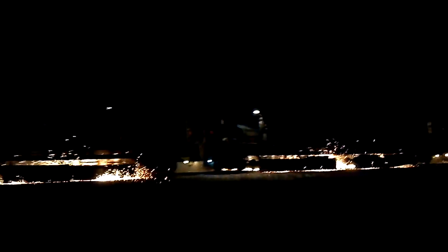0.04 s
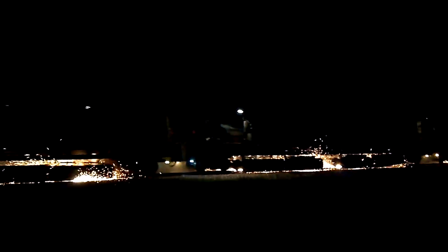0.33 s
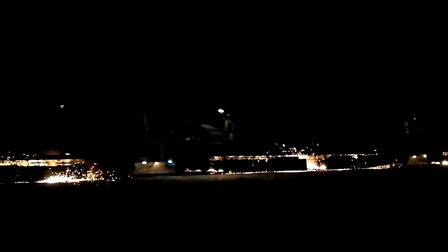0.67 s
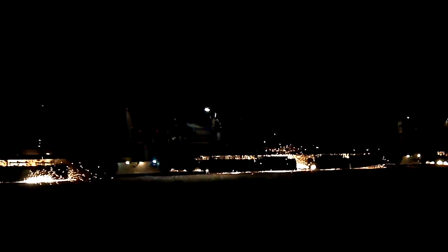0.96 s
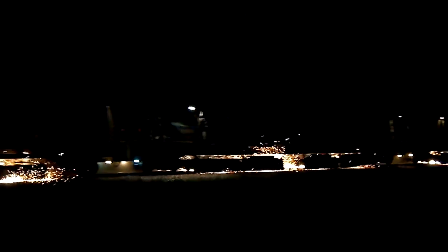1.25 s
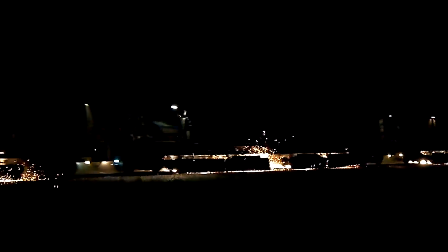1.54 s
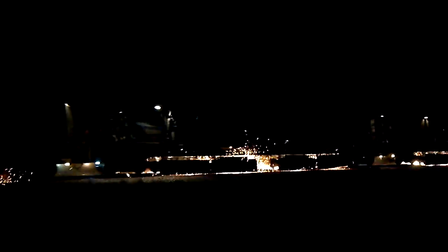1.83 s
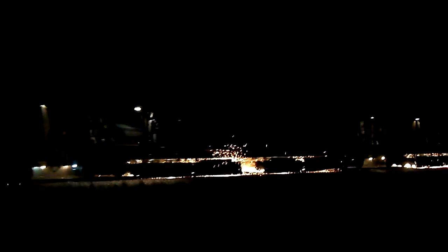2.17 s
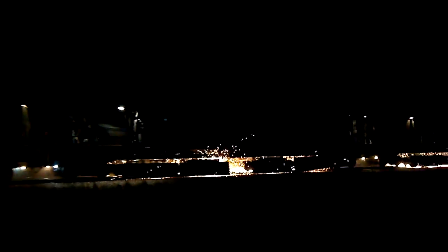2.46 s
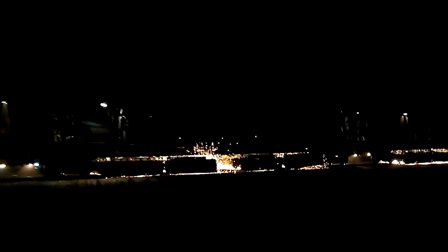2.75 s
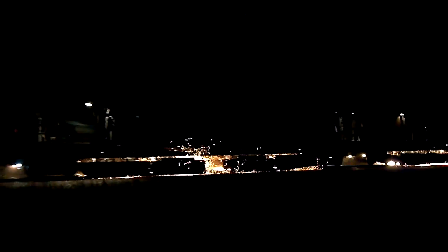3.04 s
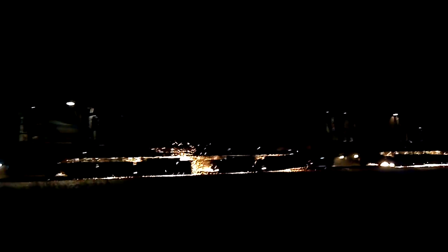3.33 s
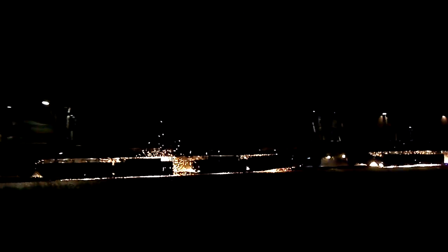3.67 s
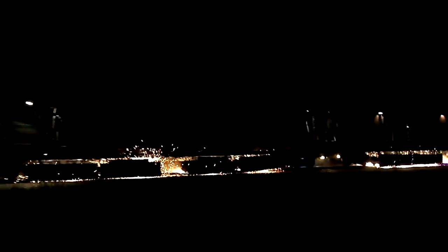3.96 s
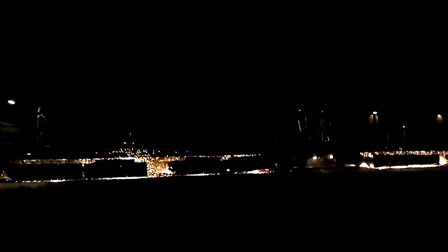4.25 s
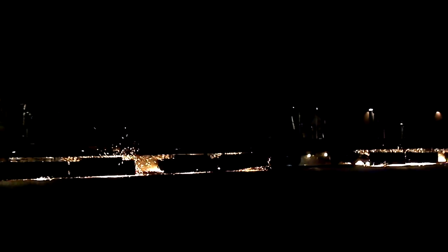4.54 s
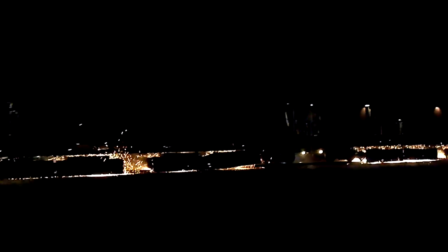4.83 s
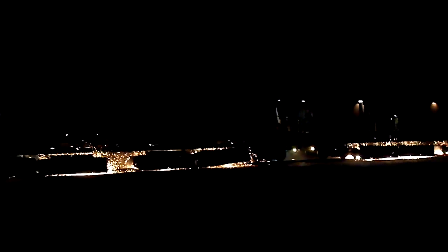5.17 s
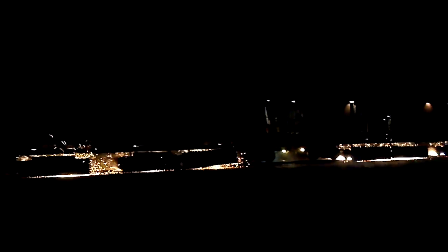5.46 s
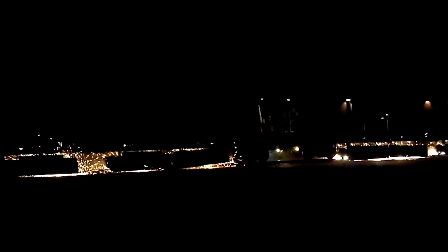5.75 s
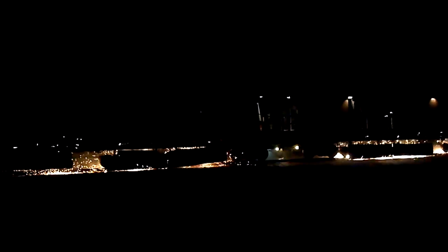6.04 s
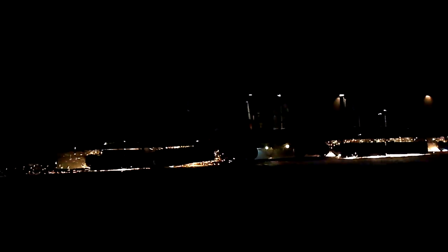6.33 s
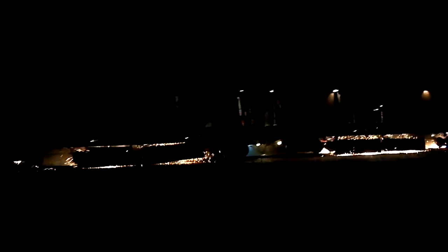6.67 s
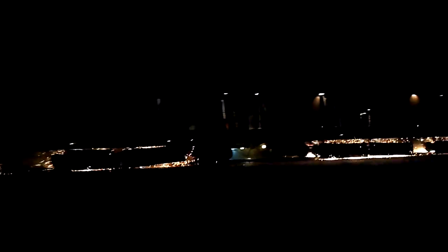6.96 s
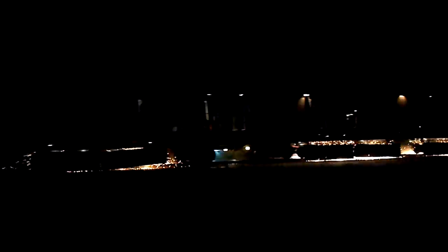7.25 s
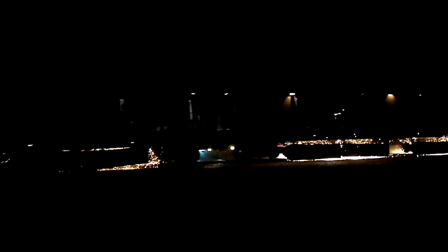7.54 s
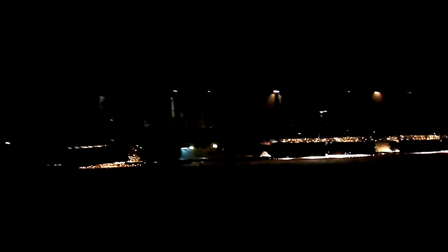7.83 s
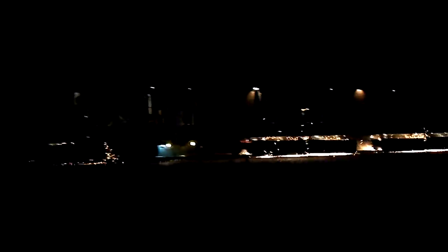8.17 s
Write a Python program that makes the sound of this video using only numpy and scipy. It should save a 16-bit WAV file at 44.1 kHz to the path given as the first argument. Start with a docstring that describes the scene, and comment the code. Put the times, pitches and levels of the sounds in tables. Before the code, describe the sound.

A rail grinding train creeps past, with droning fans, humming diesel engines, a steady grinding roar and hissing sparks.

```python
"""Rail grinding train at night

The train creeps past, a little to the left. Two big cooling fans drone at almost one pitch
and beat against each other over three diesel generators. Motors spin the grindstones, which
roar on the rail, throw hissing sparks and squeal now and then. It all arrives at two close
microphone ports, left and right, and the stereo picture is widened."""
import sys
import numpy as np
from scipy import signal
from scipy.fft import rfft, irfft, next_fast_len
from scipy.io import wavfile

SR = 44100
rng = np.random.default_rng(int(sys.argv[2]) if len(sys.argv) > 2 else 0)


def store_pcm(level_fs):
    """Save levels as 16-bit WAV."""
    pcm = np.round(np.clip(level_fs, -1, 1) * 32767).astype(np.int16)
    wavfile.write(sys.argv[1], SR, np.atleast_2d(pcm).T)


N = 361619
TIME = np.arange(N) / SR
FFT_SIZE = next_fast_len(N + 4096)
BIN_HZ = np.fft.rfftfreq(FFT_SIZE, 1 / SR)


# The near fan's speed hunts slowly up and down: time_s, blade_rate_hz
NEAR_FAN_PITCH = [(0.0, 362.26), (0.75, 357.47), (2.75, 361.54), (3.8, 358.23), (4.8, 356.73),
                  (5.85, 358.83), (6.55, 362.9), (7.2, 359.57), (8.2, 356.14)]
# The far fan holds its speed, then picks up a little: time_s, blade_rate_hz
FAR_FAN_PITCH = [(0, 364.96), (2, 364.78), (4, 364.7), (6, 364.2), (7.1, 364.06), (7.7, 365.87),
                 (8.2, 366.89)]
# The near fan fades as it moves off to the left: time_s, blade_db, octave_db
NEAR_FAN_LEVELS = [(0, -15.5, -31), (0.4, -14, -27.5), (0.9, -16, -28), (1.6, -14, -26), (1.92, -14.5, -31),
                   (2.15, -14.5, -27.5), (2.7, -13.5, -28.5), (4, -14.5, -25.5), (4.8, -16.5, -24),
                   (6.6, -17.5, -24.5), (7.2, -20.5, -25.5), (8.2, -32, -26.5)]
# The far fan swells as it draws level: time_s, blade_db, octave_db
FAR_FAN_LEVELS = [(0, -24.5, -55), (1.2, -24, -63.5), (2.8, -24, -58.5), (4, -20.5, -50), (4.8, -23, -47),
                  (5.9, -23, -33), (6.7, -18.5, -31.5), (7.2, -18.5, -33), (8.2, -13.5, -27.5)]
# The near fan's direction turns steadily: time_s, right_lag_ms, right_gain_db
NEAR_FAN_PAN = [(0, 0.4795, -4), (8.2, 0.3094, -11)]
# So does the far fan's: time_s, right_lag_ms, right_gain_db
FAR_FAN_PAN = [(0, 0.42, -9), (8.2, -0.07, -5.5)]

def fans():
    """Two fans throb at the difference of their blade rates, their octaves twice as fast."""
    near = fan(NEAR_FAN_PITCH, NEAR_FAN_LEVELS, NEAR_FAN_PAN,
               flutter_db=0.82, octave_flutter_db=0.95, overtone_right_db=7.5)
    far = fan(FAR_FAN_PITCH, FAR_FAN_LEVELS, FAR_FAN_PAN,
              flutter_db=1.05, octave_flutter_db=2.07, overtone_right_db=-2.25)
    return near - far  # their pressure waves arrive with opposite signs


def fan(pitch, levels, pan, flutter_db, octave_flutter_db, overtone_right_db):
    """A blade tone and two overtones, fluttering in the turbulent air."""
    hz, = automation(pitch)
    blade_db, octave_db = automation(levels)
    lag_ms, right_db = automation(pan)
    cycles = np.cumsum(hz) / SR
    phase = 2 * np.pi * np.array([cycles, cycles - hz * lag_ms / 1000])
    blade = from_db(blade_db + flutter_db * drift(11.6)) * np.cos(phase)
    octave = from_db(octave_db + octave_flutter_db * drift(14.6)) * np.cos(2 * phase)
    third = from_db(octave_db - 29.5 + 2 * drift(1.9)) * np.cos(3 * phase)
    drone = blade + (octave + third) * right_gain(overtone_right_db)
    return np.sqrt(2) * drone * np.array([np.ones(N), from_db(right_db)])


# The hum's strongest partials, at multiples of the crankshaft rate:
# order, midway_level_db, rise_db_per_s, waver_db, right_lag_ms, right_gain_db
STRONG_ORDERS = [(4, -39.5, 1.32, 2.5, 0.58, -3), (6, -33.5, 0, 1, 0.54, -7),
                 (20, -44.5, 1.01, 2.5, 0.032, -0.5), (22, -47.5, 1.04, 1.5, 0.069, 5.5)]
# Now and then one of them swells and fades: centre_s, length_s, order, peak_db
ORDER_SWELLS = [(1.2, 0.55, 4, -31.5), (6.1, 1.24, 4, -32), (7.55, 0.5, 4, -26), (8.15, .3, 4, -29.5),
                (.45, 0.33, 6, -27.5), (0.792, 0.322, 6, -21.5), (1.07, 0.263, 6, -27),
                (2.752, 0.346, 6, -26.5), (4.05, .2, 6, -27), (4.278, 0.173, 6, -27.5),
                (4.775, 0.42, 6, -23.5), (5.354, 0.37, 6, -25.5), (6.17, 0.37, 6, -27),
                (7.85, 0.43, 6, -26.5), (.42, 0.36, 20, -36), (1.46, 0.206, 20, -33.5),
                (2.756, 0.284, 20, -32.5), (3.2, 0.197, 20, -34), (3.886, 0.15, 20, -31),
                (4.098, 0.14, 20, -34.5), (5.123, 0.166, 20, -29), (5.399, 0.17, 20, -32.5),
                (6.715, 0.24, 20, -31), (7.298, .2, 20, -35.5), (8.15, .2, 20, -33), (.58, 0.13, 22, -38),
                (2.37, .14, 22, -36), (5.37, .18, 22, -41.5), (6.05, 0.19, 22, -37.5),
                (7.036, .16, 22, -35), (7.238, 0.142, 22, -32.5), (7.8, .16, 22, -38.5),
                (8.0, 0.184, 22, -34.5)]
# Quieter crankshaft partials fill out the hum: order, level_db
WEAK_ORDERS = [(8, -40), (10, -43.5), (14, -44.5), (16, -53.5), (18, -45.5)]
# The dark rush of exhaust and cooling air: frequency_hz, gain_db
EXHAUST_EQ = [(25, -24.5), (55, -18), (80, -12.5), (110, -5), (250, 2), (420, 0), (650, -2), (800, -7),
              (1000, -11.5), (1500, -15), (3000, -55)]

def nearest_diesel(crank_hz=30.12, rush_db=-23.5):
    """A governed generator engine: low orders fade in and out over the rush of exhaust and air."""
    hz = crank_hz * (1 + 0.003133 * drift(2.6))
    strong = 0
    for order, db, rise_db_per_s, waver_db, lag_ms, right_db in STRONG_ORDERS:
        level = from_db(db + rise_db_per_s * (TIME - TIME.mean()) + waver_db * drift(2.5))
        for centre_s, length_s, swelling_order, peak_db in ORDER_SWELLS:
            if swelling_order == order:
                level = np.maximum(level, from_db(peak_db) * bump(centre_s, length_s))
        strong += level * shaft([(order, 0)], hz, lag_ms, right_db)
    weak = engine(WEAK_ORDERS, hz, lag_ms=0.067, right_db=2.5, waver_db=1.0)
    rush = stereo_noise(EXHAUST_EQ, lag_ms=0.2207, right_db=-7.5, coherence=0.937)
    return strong + weak + from_db(rush_db + 0.96 * drift(5.3)) * rush


# Crankshaft partials of another car's engine, running a little slower: order, level_db
SLOW_ORDERS = [(3, -51), (3.5, -41.5), (4, -39), (4.5, -38.5), (6, -43.5), (6.5, -54.5), (7, -45),
               (7.5, -43), (8, -43), (9, -32.5), (9.5, -38.5), (13, -37)]
# And of a third, running a little faster: order, level_db
FAST_ORDERS = [(4, -42), (5, -37.5), (9, -36.5), (10, -40.5)]

def other_diesels(slow_crank_hz=29.82, fast_crank_hz=30.33):
    """Two more governed engines, whose orders beat slowly against those of the nearest."""
    slow_hz = slow_crank_hz * (1 + 0.00185 * drift(2.14))
    slow = engine(SLOW_ORDERS, slow_hz, lag_ms=0.43, right_db=-5.0, waver_db=1.5)
    fast_hz = fast_crank_hz * (1 + 0.002096 * drift(2.195))
    fast = engine(FAST_ORDERS, fast_hz, lag_ms=0.39, right_db=-4.0, waver_db=3.0)
    return slow + fast


def engine(orders, hz, lag_ms, right_db, waver_db, groups=3):
    """An engine's orders fade in and out in groups as the paths to it change."""
    return sum(shaft(orders[k::groups], hz, lag_ms, right_db) * from_db(waver_db * drift(3.52))
               for k in range(groups))


# Grinding dips as one car leaves and grows as the next ones come: time_s, fader_db
GRIND_FADER = [(0, -30), (0.7, -32.5), (1, -33), (2, -34), (3, -33.5), (6.4, -31), (7.8, -30), (8.2, -32.5)]
# The broad, bright roar of stone on steel: frequency_hz, gain_db
GRIND_EQ = [(300, -7), (800, -4), (1400, -2), (1850, -6.5), (2100, 0.5), (2600, 3.5), (3200, 0.5),
            (3700, 0.5), (4300, -2), (5400, 1), (7000, -9), (12000, -30)]
# The spark showers ebb and flow: time_s, fader_db
SPARK_FADER = [(0, -35), (1, -37.5), (1.75, -36.5), (1.95, -40.5), (2.4, -37), (3.1, -38.5), (5.2, -37.5),
               (5.7, -35.5), (6.4, -36.5), (7.9, -33.5), (8.2, -40)]
# Their high sizzle: frequency_hz, gain_db
SPARK_EQ = [(2000, -46), (5000, -4), (6500, -4.5), (7300, 0), (9500, 3), (11000, -0.5), (12500, -4.5),
            (14000, -9), (15000, -40.5)]
# A stone bites harder for a moment, lifting roar and sparks: centre_s, lift_db
STONE_BITES = [(.8, 4), (6.62, 2.64)]
# The next grinding car draws near from the right: time_s, level_db
NEXT_CAR_LEVEL = [(0, -37.5), (1.5, -37), (3, -44), (5, -39.5), (6.3, -39), (6.8, -37), (7.7, -34),
                  (8.2, -36.5)]
# Its duller roar: frequency_hz, gain_db
NEXT_CAR_EQ = [(400, -1), (850, -4.5), (1200, -3.5), (1520, 1), (1750, -12), (2100, 2), (2800, -4),
               (4000, -11), (8000, -20)]

def grindstones(roar_trim_db=1.1353, spark_trim_db=2.5):
    """Grit tears at the rail with a broad roar, and the spark showers hiss above it."""
    grind_db, = automation(GRIND_FADER)
    spark_db, = automation(SPARK_FADER)
    next_car_db, = automation(NEXT_CAR_LEVEL)
    bite_db = sum(lift_db * bump(centre_s, length_s=0.094) for centre_s, lift_db in STONE_BITES)
    roar_gain = from_db(grind_db + bite_db + roar_trim_db + 0.5 * drift(16))
    roar = stereo_noise(GRIND_EQ, lag_ms=-0.3738, right_db=-1, coherence=0.328)
    next_car = stereo_noise(NEXT_CAR_EQ, lag_ms=-0.0057, right_db=1.5, coherence=0.528)
    hiss_gain = from_db(spark_db + bite_db + spark_trim_db + 0.66 * drift(29.5))
    hiss = stereo_noise(SPARK_EQ, lag_ms=-0.3607, right_db=-1.5, coherence=0.126)
    return roar_gain * roar + from_db(next_car_db) * next_car + hiss_gain * hiss


# The motors' buzz, at multiples of the spindle rate: order, relative_db
SPINDLE_ORDERS = [(13, -43), (14, -48.5), (15, -46.5), (16, -45.5), (17, -58), (18, -51), (19, -45.5),
                  (20, -47.5), (21, -50), (22, -48.5), (23, -47.5), (24, -47.5), (25, -47.5), (26, -45),
                  (27, -50), (28, -52.5), (34, -45.5), (35, -52), (36, -47.5), (37, -60)]
SPINDLE_HZ = 60.25

def motors(count=3, trim_db=-2.0):
    """Spindles along the car slip and shudder under load; their level follows the grinding."""
    grind_db, = automation(GRIND_FADER)
    load_db = 1.17 * (grind_db - np.mean(grind_db))
    buzz = 0
    for place in np.linspace(-1, 1, count):
        hz = SPINDLE_HZ * (1 + 0.0016 * place + 0.003 * drift(4))
        buzz += shaft(SPINDLE_ORDERS, hz, lag_ms=0.104 + 0.096 * place, right_db=-7.5)
    return buzz / np.sqrt(count) * from_db(load_db + trim_db)


# Upper spindle partials ringing in the car's skirt: order, level_db
SKIRT_BUZZ = [(29, -40.5), (30, -55), (31, -62.5), (32, -55.5), (33, -54), (39, -53), (41, -52.5)]
# The band of grinding noise that rings with them: frequency_hz, gain_db
SKIRT_EQ = [(1200, -25.5), (1600, 12), (1900, 4.5), (2100, 10), (2500, -32.5)]

def skirt(ring_db=-43):
    """The nearest car's skirt rings with the grinding and the motors: a narrow, buzzing band."""
    hz = SPINDLE_HZ * (1 + 0.003 * drift(4))
    buzz = shaft(SKIRT_BUZZ, hz, lag_ms=0.283, right_db=-2.0) * from_db(1.52 * drift(5.2))
    ring = stereo_noise(SKIRT_EQ, lag_ms=0.277, right_db=3.0, coherence=1.0)
    return buzz + from_db(ring_db) * ring


# Stones sing (narrow) or scrape (wide): start_s, end_s, pitch_hz, width_hz, level_db
SQUEAL_CUES = [(0.0, 0.5, 8030, 110, -50.5), (0.0, 0.75, 9095, 130, -46.5), (0.781, 0.887, 3717, 330, -40),
               (0.994, 1.95, 9260, 140, -44.5), (1.235, 1.356, 9120, 90, -39.5),
               (1.55, 1.637, 9095, 110, -33), (1.802, 1.861, 9180, 90, -37.5),
               (1.1, 1.55, 14300, 700, -48.5), (2.0, 2.95, 12400, 700, -50.5),
               (2.159, 2.64, 12500, 2800, -38), (2.245, 2.6, 8800, 900, -42), (3.0, 3.07, 4850, 140, -43.5),
               (3.597, 3.7, 4840, 140, -39.5), (4.1, 4.17, 4850, 120, -40), (4.551, 4.66, 4817, 180, -39.5),
               (4.7, 8.1, 6730, 360, -47), (5.4, 7.5, 10200, 600, -50.5), (6.499, 8.1, 3720, 260, -51.5),
               (6.593, 6.602, 10450, 200, -28.5), (7.1, 8.05, 10260, 450, -43.5)]

def squeals(right_db=-20, ragged_db=3.0):
    """A stone catches on the rail and sings for a while, swelling and fading unevenly."""
    out = np.zeros(N)
    for start_s, end_s, pitch_hz, width_hz, level_db in SQUEAL_CUES:
        span = np.flatnonzero((TIME >= start_s) & (TIME < end_s))
        swell = np.sqrt(2) * np.sin(np.linspace(0, np.pi, len(span)))
        out[span] += from_db(level_db) * swell * noisy_tone(pitch_hz, width_hz, len(span))
    return out * from_db(ragged_db * drift(22)) * right_gain(right_db)


# Grit flies off a stone: start_s, level_db
SPIT_CUES = [(6.594, -19)]
# Its brittle crack: frequency_hz, gain_db
SPIT_EQ = [(1500, -3.5), (3500, 1), (5500, -11.5), (8000, 3.5), (9200, -2.5), (10300, 1.5), (11500, -2),
           (12800, 1), (14000, -12)]

def grit_spit(t60_s=0.0214):
    """A stone spits grit with a short, bright crack."""
    envelope = sum((TIME >= start_s) * from_db(level_db - 60 * np.abs(TIME - start_s) / t60_s)
                   for start_s, level_db in SPIT_CUES)
    return envelope * stereo_noise(SPIT_EQ, lag_ms=0.1835, right_db=-1.0, coherence=0.34)


# The pitch range of flaring grit: low_hz, high_hz
FLARE_PITCHES = (3185, 11020)

def grit_flares(count=110, length_s=0.067, level_db=-49, spread_db=1.42, pan_spread_db=4.5):
    """Single grits flare along the train, each a short hiss at a pitch of its own."""
    length = int(length_s * SR)
    out = np.zeros((2, N + length))
    swell = np.hanning(length)
    low_hz, high_hz = FLARE_PITCHES
    for (when, pitch), (strength, side) in zip(rng.random((count, 2)), rng.standard_normal((count, 2))):
        hiss = noisy_tone(low_hz * (high_hz / low_hz) ** pitch, width_hz=396, samples=length)
        pan_db = pan_spread_db * side * np.array([[1], [-1]])
        gain = from_db(level_db + spread_db * strength + pan_db)
        start = int(when * N)
        out[:, start:start + length] += gain * swell * hiss
    return out[:, :N]


# Thin tones in the background: pitch_hz, width_hz, level_db
THIN_TONES = [(1078, 14, -46), (2048, 40, -62), (3969, 10, -49.5)]

def thin_whines(right_db=-20.5):
    """A faint fan overtone near 1078 Hz and two thin, steady whines above it."""
    tones = sum(from_db(db) * noisy_tone(hz, width_hz, N) for hz, width_hz, db in THIN_TONES)
    return tones * right_gain(right_db)


def yard_reverb(sound, t60_s, wet_db):
    """Ballast, cars and buildings scatter the sound, differently for each port."""
    t = TIME[:SR // 2]
    echoes = rng.standard_normal((2, len(t))) * from_db(-60 * t / t60_s)
    echoes /= np.sqrt(np.sum(echoes ** 2, axis=1, keepdims=True))
    return sound + from_db(wet_db) * signal.fftconvolve(sound[:1], echoes, axes=1)[:, :N]


def shaft(orders, hz, lag_ms, right_db):
    """The partials of a turning shaft at both ports; the wave repeats every second turn."""
    turn = np.linspace(0, 2, 4096, endpoint=False)
    wave = sum(np.sqrt(2) * from_db(db) * np.sin(2 * np.pi * (order * turn + rng.random()))
               for order, db in orders)
    left_turns = np.cumsum(hz) / SR
    turns = np.array([left_turns, left_turns - hz * lag_ms / 1000])
    return np.interp(turns % 2, turn, wave) * right_gain(right_db)


def noisy_tone(hz, width_hz, samples):
    """A resonance driven by noise, at unit power."""
    radius = np.exp(-np.pi * width_hz / SR)
    poles = [1, -2 * radius * np.cos(2 * np.pi * hz / SR), radius ** 2]
    ringing = signal.lfilter([1], poles, rng.standard_normal(samples))
    return unit_power(signal.lfilter([1], poles, ringing))


def stereo_noise(eq, lag_ms, right_db, coherence):
    """Shaped noise; the right port hears it lag_ms later (negative: earlier), partly by other paths."""
    direct, scattered = rfft(rng.standard_normal((2, FFT_SIZE))) * eq_gain(eq)
    delayed = direct * np.exp(-2j * np.pi * BIN_HZ * lag_ms / 1000)
    right = coherence * delayed + np.sqrt(1 - coherence ** 2) * scattered
    return unit_power(irfft([direct, right], FFT_SIZE)[:, :N]) * right_gain(right_db)


def drift(rate_hz):
    """A random wobble at unit power, mostly slower than rate_hz."""
    hop, settle = 40, 2000
    pole = np.exp(-2 * np.pi * rate_hz * hop / SR)
    noise = rng.standard_normal(N // hop + settle + 2)
    slow = signal.lfilter([1], [1, -2 * pole, pole ** 2], noise)[settle:]
    return np.interp(np.arange(N) / hop, np.arange(len(slow)), unit_power(slow))


def bump(centre_s, length_s):
    """A smooth rise and fall of height 1."""
    return np.exp(-(2 * (TIME - centre_s) / length_s) ** 2)


def automation(rows):
    """One sample-by-sample curve for each column after time_s."""
    time_s, *columns = np.transpose(rows)
    return [np.interp(TIME, time_s, column) for column in columns]


def eq_gain(points):
    """An EQ curve's gain at every frequency bin."""
    hz, db = np.transpose(points)
    return from_db(np.interp(np.log(BIN_HZ + 1), np.log(hz), db))


def right_gain(db):
    """Stereo gains that change only the right side."""
    return from_db([[0], [db]])


def from_db(db):
    """Decibels to gain."""
    return 10 ** (np.asarray(db) / 20)


def unit_power(x):
    """Scale to an RMS of 1."""
    return x / np.sqrt(np.mean(x ** 2) + 1e-20)


def scene():
    """The whole train, as it reaches the two ports."""
    spindles = yard_reverb(motors(), t60_s=0.66, wet_db=-10.5)
    whines = thin_whines()
    grinding = grindstones() + skirt() + grit_flares() + squeals() + grit_spit()
    drone = fans()
    generators = yard_reverb(nearest_diesel() + other_diesels(), t60_s=0.154, wet_db=-15.0)
    return drone + generators + grinding + spindles + whines


# The tone of the right port against the left: frequency_hz, right_minus_left_db
BALANCE_EQ = [(700, -1.5), (1500, 4), (2100, -0.5), (3000, -0.97), (4100, 0.31), (5400, 2.1), (7000, 1.32),
              (9500, 2.57), (13500, -0.5)]

def record(dry, crossfeed=0.9784, delay_samples=16, cutoff_hz=15100):
    """Each side has a late copy of the other taken away, which widens the picture; the top is cut."""
    ports = rfft(dry, FFT_SIZE)
    delay = np.exp(-2j * np.pi * BIN_HZ * delay_samples / SR)
    wide = ports - crossfeed * ports[::-1] * delay
    balance = eq_gain(BALANCE_EQ) ** np.array([[-0.5], [0.5]])  # half to each side
    low_pass = 1 / np.sqrt(1 + (BIN_HZ / cutoff_hz) ** 1000)
    return irfft(wide * balance * low_pass, FFT_SIZE)[:, :N]


dry = scene()
out = record(dry)
store_pcm(out)
```